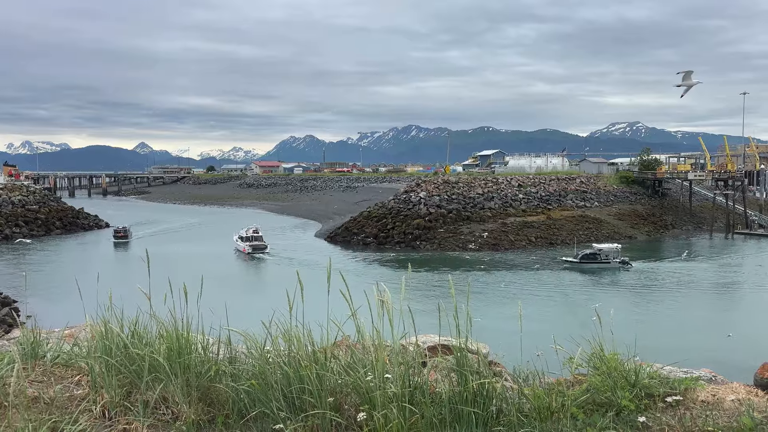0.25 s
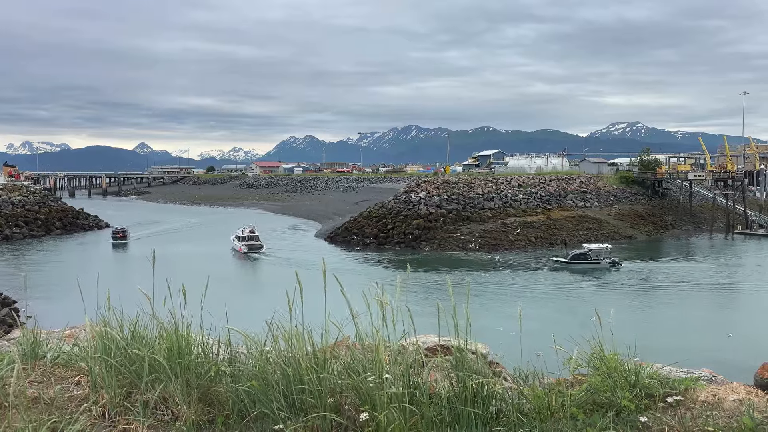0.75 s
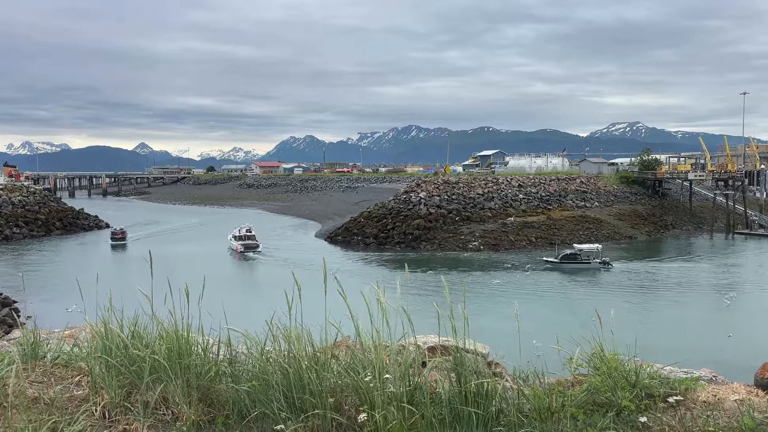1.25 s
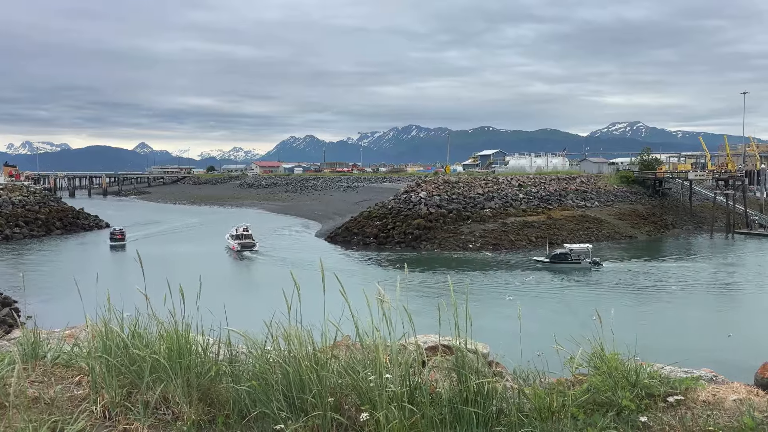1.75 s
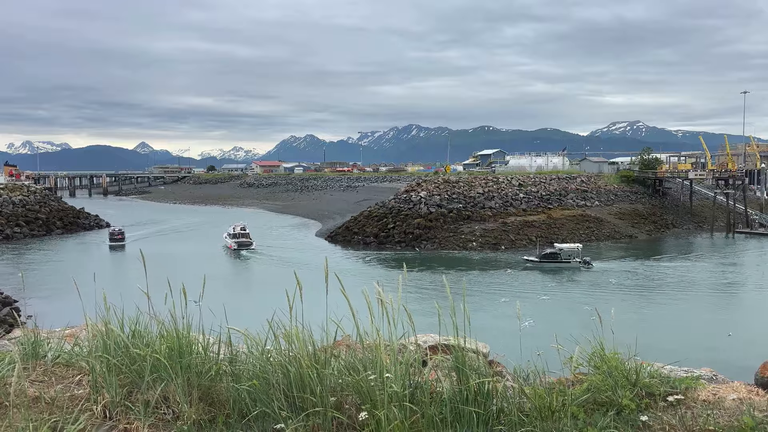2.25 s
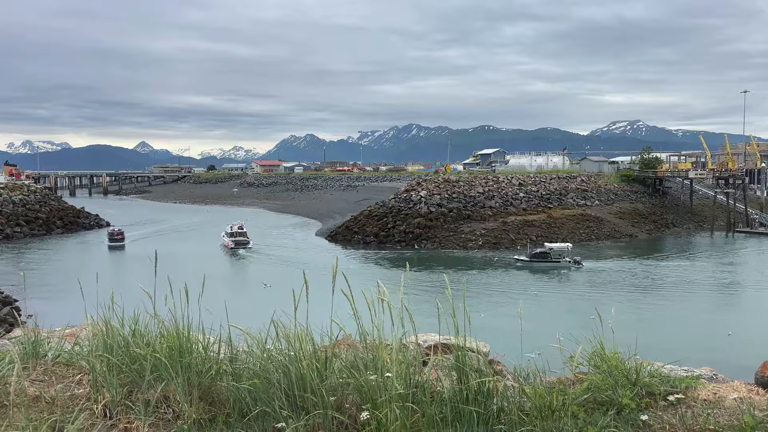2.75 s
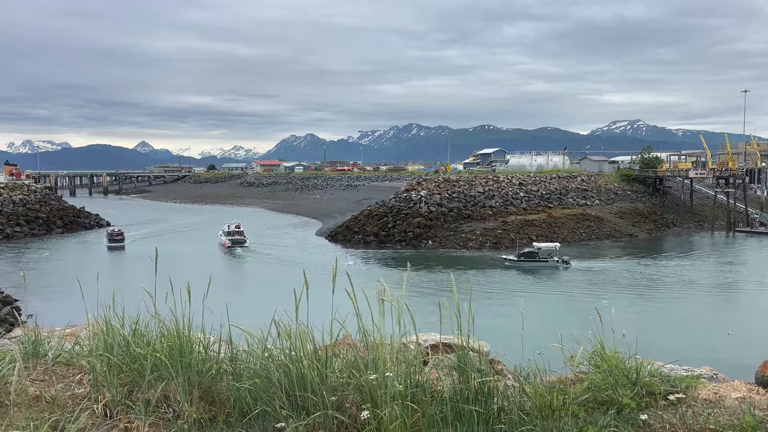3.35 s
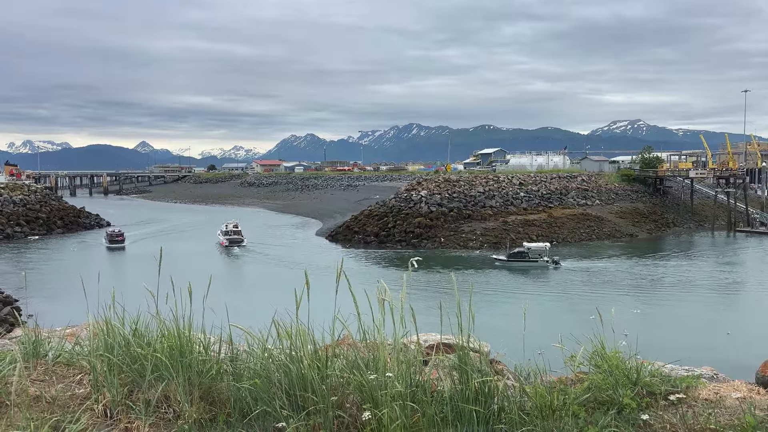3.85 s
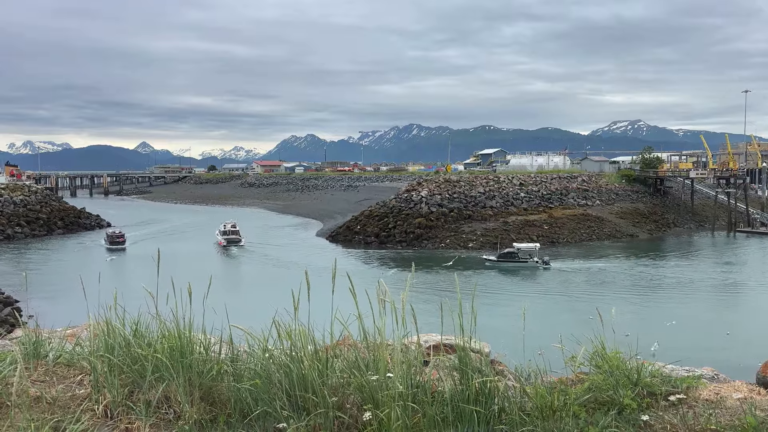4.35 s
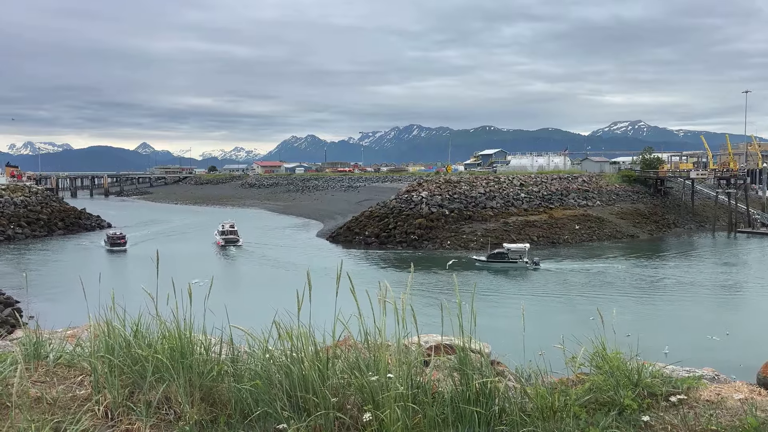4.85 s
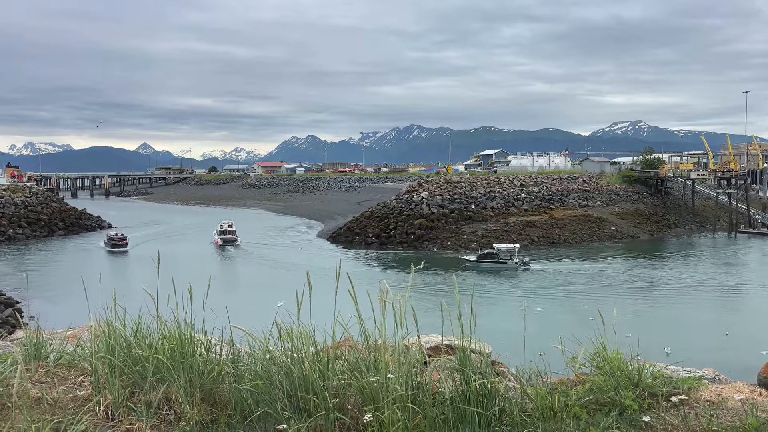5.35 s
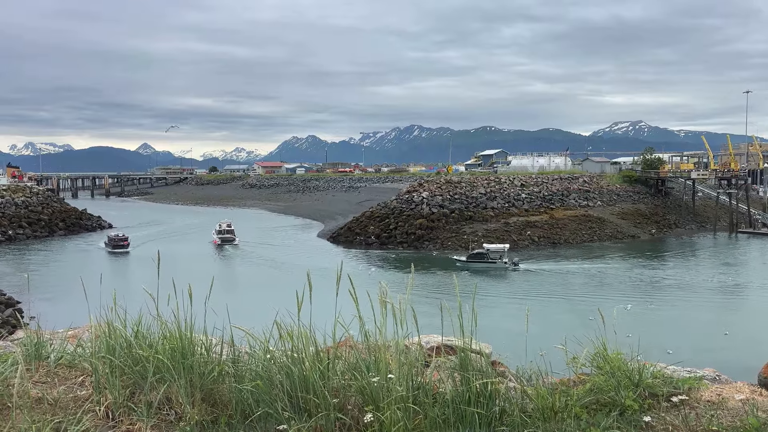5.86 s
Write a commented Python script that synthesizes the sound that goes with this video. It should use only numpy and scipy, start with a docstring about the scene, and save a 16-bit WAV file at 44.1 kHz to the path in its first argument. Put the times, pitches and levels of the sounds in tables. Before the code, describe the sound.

Outdoors at a harbour entrance, heard in stereo from a grassy bank. A low, steady rumble of small boat motors runs throughout, with water hissing softly along the stones. Gulls cry at once: overlapping mews, yelps and high whistles, partly on the right, with rasping screeches around 0.4-0.6 s and faint distant birds behind. From 1.1 to 2.1 s three wails climb and break upward. A dense cluster of mews, whistles and screeches fills 2.1-2.8 s. Short hoarse cackles follow from 2.9 to 3.8 s, with small dry knocks near 3 and 3.6 s, while wash and bright grassy rustle swell most strongly around 3.5 s. From 4.0 to 4.6 s a near gull chatters shrilly on the right. Weaker, spaced cackles continue from 4.9 to 6 s, with a mild swell of wash near 5.8 s. Breakwaters return a faint echo and thin tail.

```python
"""Gulls cry at once over a harbour entrance, in mews, yelps and whistles, with short cackles later on.
Boats rumble low, their wash hisses on the shore, and a bright rustle of tall grass, blurred with far
gull voices, swells several times. Each call is a sum of harmonics with an unsteady pitch; boats, wash and
rustle are banded noise, the boats with motor tones added. Small dry ticks are decaying bursts of noise,
and stone breakwaters return a distinct echo and a thin tail."""
import sys
import numpy as np
from scipy import signal
from scipy.io import wavfile
from scipy.ndimage import map_coordinates

SR = 44100
rng = np.random.default_rng(int(sys.argv[2]) if len(sys.argv) > 2 else 0)


def output_pcm(signal):
    """Save a mono or channel-first signal as 16-bit PCM at the path in sys.argv[1].

    Samples are clipped to [-1, 1] before scaling.
    """
    pcm = np.clip(np.atleast_2d(signal).T, -1, 1) * 32767
    wavfile.write(sys.argv[1], SR, np.round(pcm).astype(np.int16))


N = 269451
TIME = np.arange(N) / SR
CUTOFF_HZ = 15800  # no harmonic is sounded above this, and the final low-pass cuts here

# harmonics of a mew, from the fundamental up: relative level/dB
MEW_PARTIALS_DB = [-27, 0.5, -27, -25, -35, -40]
MEW_SAG = 0.038  # fall from start to end, as a share of the pitch


def from_db(db):
    """Decibels to amplitude gain: 20 dB is a factor of ten."""
    return 10 ** (np.asarray(db) / 20)


def rms_one(x):
    """Normalise mean power: scale to rms 1."""
    return x / np.sqrt(np.mean(x ** 2) + 1e-20)


def at_hz(points, hz):
    """Interpolate a spectrum linearly on a log-frequency axis."""
    freqs, values = np.transpose(points)
    return np.interp(np.log(hz), np.log(freqs), values)


def drift(rate, size=N):
    """Random modulation: `rate` normal values a second, joined by curves if short, by lines at full length."""
    at = np.arange(size) * rate / SR + 2
    values = rng.standard_normal(int(at[-1]) + 4)
    return map_coordinates(values, [at], order=2 if size < N else 1, mode="nearest")


def band(x, low_hz, high_hz):
    """Butterworth band-pass: a maximally flat pass band."""
    sos = signal.butter(2, [low_hz, min(high_hz, .45 * SR)], "band", fs=SR, output="sos")
    return signal.sosfilt(sos, x)


def add(out, s, sound, pan_db):
    """Intensity panning: mix a mono sound in at time s, the left `pan_db` above the right."""
    start = max(round(s * SR), 0)
    sound = sound[:N - start]
    sides = from_db(np.array([[.5], [-.5]]) * pan_db)
    out[:, start:start + len(sound)] += sound * sides / sides.mean()


def humps(rows):
    """Superpose Gaussian rises and dips in level, in dB."""
    return sum(db * np.exp(-((TIME - s) / width) ** 2) for s, width, db in rows)


def banded_noise(spectrum, flicker_db, flicker_rate):
    """Filtered noise: half-octave bands, each flickering on its own, partly correlated between ears; rms 1."""
    # likeness of the two ears: f/Hz, left-right correlation
    likeness = [(40, 0.97), (170, 0.95), (260, 0.78), (400, -0.22), (700, -0.03), (1500, 0.17),
                (9000, -0.027)]
    edges = 20 * 2 ** np.arange(0, 10.1, .5)
    white = rng.standard_normal((2, 2, N))
    out = 0
    for k, (low, high) in enumerate(zip(edges, edges[1:])):
        hz = np.sqrt(low * high)
        if spectrum[0][0] / np.sqrt(2) < hz < spectrum[-1][0] * np.sqrt(2):
            mid, side = band(white[k % 2], low, high)
            alike = np.clip(at_hz(likeness, hz), -1, 1)
            gain = from_db(at_hz(spectrum, hz) + flicker_db * drift(flicker_rate))
            stereo = np.sqrt(1 + alike) * mid + np.sqrt(1 - alike) * side * [[1], [-1]]
            out = out + gain * stereo
    return rms_one(out)


def glide(length, hz, change, arch=0):
    """Frequency modulation of a note: a slide through `hz`, both ends lowered by the arch."""
    along = np.linspace(-.5, .5, int(length * SR))
    return hz * (1 + change * along - arch * (2 * along) ** 2)


def voice(pitch, partials_db, waver, rasp, flutter_db):
    """Harmonic synthesis of a syrinx: the pitch wavers slowly and jitters fast, and the strength flutters."""
    size = len(pitch)
    pitch = pitch * (1 + waver * drift(92.5, size) + rasp * drift(884, size))
    phase = 2 * np.pi * np.cumsum(pitch) / SR
    tone = sum(from_db(db) * np.sin(k * phase + rng.uniform(0, 2 * np.pi))
               for k, db in enumerate(partials_db, 1) if k * pitch.mean() < CUTOFF_HZ)
    return tone * from_db(flutter_db * drift(122.6, size))


def swell(size, loudest, fullness):
    """Amplitude envelope of one effort: an arch with its top at the share `loudest`; rms 1."""
    top = np.clip(loudest, .1, .9)
    angle = np.interp(np.linspace(0, 1, size), [0, top, 1], [0, np.pi / 2, np.pi])
    return rms_one(np.abs(np.sin(angle)) ** fullness)  # a smaller exponent makes a fuller arch


def cry(pitch, partials_db, db, loudest):
    """A voiced call: quasi-periodic harmonics under a single arch of effort."""
    tone = voice(pitch, partials_db, waver=0.0042, rasp=0.0073, flutter_db=2.5)
    return from_db(db + 3.5) * tone * swell(len(pitch), loudest, fullness=0.29)


def boats(ear_lag_s=0.00079):
    """Periodic firing gives tones at multiples of a wandering rate in a broad rumble; the left ear lags."""
    # exhaust and low wind: f/Hz, relative density/dB per Hz
    rumble = [(20, -37), (30, -31), (40, -0.5), (55, 1), (90, -3), (130, -4.5), (200, -9), (280, -13),
              (400, -21.5), (800, -32.5), (2000, -82)]
    # motor tones: multiple of the firing rate, mean level/dB
    motor_orders = [(3, -42.5), (4, -51), (5.1, -46)]
    firing_hz = 39.87  # mean
    sound = from_db(-28.5) * banded_noise(rumble, flicker_db=1.0, flicker_rate=9)
    for multiple, db in motor_orders:
        order_hz = multiple * firing_hz * (1 + 0.00843 * drift(4))
        phase = 2 * np.pi * np.cumsum(order_hz) / SR
        sound = sound + from_db(db + 2 * drift(2.17)) * np.sin(phase)
    return np.array([np.interp(TIME - ear_lag_s, TIME, sound[0]), sound[1]])


def shore(hump_hz=1950, hump_db=4, hollow_hz=2550, hollow_db=-4.0):
    """Turbulent wash is broadband noise, swelling as wakes reach the stones, with a spectral hump and hollow."""
    # water along the shore: f/Hz, relative density/dB per Hz
    wash_spectrum = [(150, -10), (450, 2), (900, 3), (1750, -0.5), (2150, -7.5), (2600, -7.5),
                     (3600, -13.5), (5000, -26), (7000, -37), (10000, -37.5)]
    # swells and lulls: t/s, half width to 1/e /s, change/dB
    wash_swells = [(.1, 0.31, -3.5), (3.6, 0.38, 4.5), (5.8, 0.27, 2.5)]
    wash_db = -38  # before swells and lulls
    wash = banded_noise(wash_spectrum, flicker_db=2.0, flicker_rate=22)
    for hz, db in ((hump_hz, hump_db), (hollow_hz, hollow_db)):
        resonance = signal.lfilter(*signal.iirpeak(hz, 5, fs=SR), wash)
        wash = wash + (from_db(db) - 1) * resonance
    return from_db(wash_db + humps(wash_swells)) * rms_one(wash) * from_db([[-.55], [.55]])


def grass():
    """Amplitude-modulated noise: a bright grainy hiss that swells several times, some of it blurred gull voices."""
    # bright rustling hiss: f/Hz, relative density/dB per Hz
    rustle = [(1500, -20), (3500, 1), (5400, 11), (7000, -15), (8500, -10), (12000, -13), (16000, -30)]
    # rises of the bright rustling hiss: t/s, half width to 1/e /s, rise/dB
    rises = [(1.65, .1, 3.5), (2.33, 0.34, 7), (3.53, 0.41, 12.5), (5.8, 0.32, 3)]
    level_db = -59.5 + humps(rises)
    grain = from_db(level_db + 2.4 * drift(260))  # quick uneven bursts
    return grain * banded_noise(rustle, flicker_db=3.5, flicker_rate=23) * from_db([[-1.0], [1.0]])


def yelps():
    """Timbre follows harmonic balance: lower cries, with more or less brass above the second harmonic."""
    # t/s, length/s, f/Hz, glide as a share of f, relative level/dB, overtone change/dB, left-right/dB
    yelp_notes = [(.01, 0.062, 1124, 0, -54, 0.5, -15), (0.792, 0.092, 1150, .05, -38.5, -25, 3.5),
                  (1.077, 0.022, 1170, 0.034, -47.5, -12, 2), (1.552, 0.096, 1170, -0.0097, -46.5, 1, 2),
                  (1.751, 0.022, 1176, -0.025, -49.5, -3, 0), (2.369, 0.035, 1158, -0.031, -40, -13, 4),
                  (2.653, 0.043, 1290, -0.053, -47.5, -12, 4), (4.04, 0.105, 1240, -0.043, -57, 9.5, 1),
                  (4.554, 0.019, 1267, 0.044, -39, 1.5, -20), (4.674, 0.096, 1190, 0.03, -49.5, 0.5, -17)]
    # harmonics from the fundamental up: relative level/dB
    yelp_partials_db = [-19, 1.5, -10, -11.5, -20.5, -27.5, -30, -32, -32, -36]
    out = np.zeros((2, N))
    overtone = np.arange(len(yelp_partials_db)) >= 2
    for s, length, hz, change, db, brass_db, pan_db in yelp_notes:
        pitch = glide(length, hz, change, arch=-.014)
        partials_db = yelp_partials_db + brass_db * overtone
        add(out, s, cry(pitch, partials_db, db, loudest=.52), pan_db)
    return out


def breakwaters(x, t60=0.77, build_up_s=0.0033):
    """Diffuse reverberation: rough stone scatters a call into an exponential tail, different at each ear."""
    t = TIME[:SR]
    decay = from_db(-60 * t / t60)
    tail = band(rng.standard_normal((2, SR)), 630, 5200) * decay * (1 - np.exp(-t / build_up_s))
    tail /= np.sqrt(np.sum(tail ** 2) / 2)
    return signal.fftconvolve(x[None], tail, axes=1)[:, :N]


def mews():
    """A dominant second harmonic carries these cries, whose pitch sags through each note."""
    # t/s, length/s, f/Hz, relative level/dB, left-right/dB
    mew_notes = [(0.074, 0.062, 1637, -50, -20), (0.324, .093, 1640, -53, -15),
                 (0.35, 0.051, 1800, -49.5, -17), (0.552, 0.26, 887, -49.5, -1),
                 (0.579, 0.076, 1683, -52.5, -17), (0.745, 0.093, 869, -42, 2),
                 (0.827, 0.095, 1690, -50, -15), (1.1, .11, 1734, -45.5, 4), (1.21, 0.18, 1687, -54, 6),
                 (1.436, 0.057, 1695, -52, -15), (1.641, 0.051, 1740, -46.5, 3),
                 (1.701, 0.065, 1727, -51.5, -13), (1.98, 0.1, 1760, -57, 3), (2.172, 0.02, 1687, -39.5, 4),
                 (2.24, 0.084, 1716, -46, 3), (2.401, 0.024, 1687, -43.5, 4), (2.468, 0.119, 1680, -45, 6),
                 (2.598, 0.038, 1697, -40.5, 2), (2.828, 0.035, 1700, -41.5, 3),
                 (5.247, 0.077, 1647, -48, -23)]
    out = np.zeros((2, N))
    for s, length, hz, db, pan_db in mew_notes:
        pitch = glide(length, hz, -MEW_SAG, arch=.002)
        add(out, s, cry(pitch, MEW_PARTIALS_DB, db, loudest=0.45), pan_db)
    return out


def whistles():
    """Nearly sinusoidal high notes; the more the pitch is arched upward, the more it quavers."""
    # t/s, length/s, f/Hz, glide and arch as shares of f, relative level/dB, left-right/dB
    whistle_notes = [(.195, 0.098, 4710, 0.07, 0.053, -54, -22), (.275, 0.075, 4300, -0.036, 0, -51.5, -20),
                     (1.4, .03, 3810, -0.072, -0.0043, -56.5, -8),
                     (1.629, .18, 3910, -.04, -0.0094, -56, 1),
                     (1.895, 0.23, 4140, -0.014, -0.0022, -58, 5),
                     (2.095, .23, 2870, 0.019, -0.0058, -46.5, 3),
                     (2.206, 0.14, 4800, -0.073, .015, -51.5, -7), (2.25, 0.16, 5860, .04, 0.0049, -62, 3),
                     (2.316, 0.133, 4100, -.012, 0.0057, -46.5, 3),
                     (2.495, .18, 7370, -.075, -0.036, -61.5, -4),
                     (3.995, .016, 8300, .3, -0.0092, -62, -6), (4.46, .026, 8700, .22, -.02, -59.5, -15),
                     (4.603, .03, 8100, -.08, 0, -61, -15)]
    # harmonics from the fundamental up: relative level/dB
    whistle_partials_db = [0.5, -29]
    quaver, quaver_per_s = .2, 62  # share of the arch, new random values a second
    out = np.zeros((2, N))
    for s, length, hz, change, arch, db, pan_db in whistle_notes:
        pitch = glide(length, hz, change, arch)
        pitch = pitch * (1 + quaver * max(arch, 0) * drift(quaver_per_s, len(pitch)))
        add(out, s, cry(pitch, whistle_partials_db, db, loudest=0.3), pan_db)
    return out


def colony(count=10):
    """Distance weakens sound: birds farther off mew faintly at random pitches in the opening chorus."""
    low_hz, high_hz, length_s = 1110, 1790, 0.074
    chorus_end_s = 2.6  # the last moment a far cry may start
    out = np.zeros((2, N))
    for when, high, side in rng.random((count, 3)):
        pitch = glide(length_s, low_hz + high * (high_hz - low_hz), -MEW_SAG)
        far_cry = cry(pitch, MEW_PARTIALS_DB, -59.5, loudest=0.82)
        add(out, when * chorus_end_s, far_cry, pan_db=-8 * side)
    return out


def screeches():
    """Chaotic vibration of the syrinx: pitch jitter smears the harmonics into rasping, throbbing bands."""
    # t/s, length/s, f/Hz, level/dB before the arch, left-right/dB
    screech_notes = [(0.394, 0.14, 1204, -51, -18), (0.496, 0.15, 1154, -52.5, -24),
                     (2.367, 0.15, 1171, -48.5, -1), (2.492, 0.22, 1110, -54, -1)]
    # throat resonances: f/Hz, relative level/dB
    screech_throat = [(1200, -24), (2400, 3.5), (3600, 4.5), (4700, 5.5), (5900, -8), (7200, -10),
                      (9500, -34)]
    pulse_hz, pulse_depth = 18, 0.33
    out = np.zeros((2, N))
    for s, length, hz, db, pan_db in screech_notes:
        size = int(length * SR)
        partials_db = at_hz(screech_throat, hz * np.arange(1, 9))
        tone = voice(np.full(size, hz), partials_db, waver=.01, rasp=.025, flutter_db=3)
        tone = tone * (1 - pulse_depth * np.cos(2 * np.pi * pulse_hz * TIME[:size]))
        add(out, s, from_db(db) * rms_one(tone) * swell(size, loudest=0.32, fullness=0.44), pan_db)
    return out


def wails(count=7):
    """A rising source moves its harmonics through fixed throat resonances, then breaks upward and sinks."""
    # t/s, starting f/Hz, relative level of the climb/dB, relative level of the broken note/dB
    wail_notes = [(1.115, 835, -45.5, -45), (1.455, 750, -43, -41.5), (1.832, 730, -43, -37)]
    # throat resonances: f/Hz, relative level/dB
    wail_throat = [(750, -35), (1450, -2.5), (1720, 0), (2000, -19), (2300, 3), (2500, -15), (3300, -36),
                   (6000, -40)]
    climb_s, top_hz, pan_db = .122, 886, 4.5
    break_s, break_from_hz, break_to_hz, settle_s = 0.087, 1440, 1245, .033
    out = np.zeros((2, N))
    along = np.linspace(0, 1, int(climb_s * SR))
    settling = np.exp(-TIME[:int(break_s * SR)] / settle_s)
    broken = break_to_hz + (break_from_hz - break_to_hz) * settling
    for s, hz, climb_db, broken_db in wail_notes:
        pitch = hz + (top_hz - hz) * along ** 1.7  # climbs ever faster
        partials_db = [at_hz(wail_throat, (k + 1) * pitch) for k in range(count)]
        add(out, s, cry(pitch, partials_db, climb_db, loudest=0.54), pan_db)
        add(out, s + climb_s, cry(broken, [-1, -21, -28, -43], broken_db, loudest=0.09), pan_db)
    return out


def slap(x, delay_s=.05):
    """Specular reflection: the nearest breakwater returns one distinct, delayed echo."""
    return from_db(-15) * np.array([np.interp(TIME - delay_s, TIME, ear, left=0) for ear in x])


def ticks(decay_s=0.0021):
    """Damped resonance: small dry knocks, each a noise burst that dies within milliseconds in one broad band."""
    # t/s, peak level/dB, f/Hz
    tick_events = [(1.183, -46, 6200), (2.187, -42, 6470), (2.947, -23.5, 1520), (3.018, -24, 1580),
                   (3.02, -29.5, 3300), (3.450, -38, 6460), (3.622, -27, 1490), (3.78, -42, 8200)]
    out = np.zeros((2, N))
    t = TIME[:SR // 50]
    for s, db, hz in tick_events:
        burst = rng.standard_normal(len(t)) * np.exp(-t / decay_s)
        tick = band(band(burst, hz / 1.3, hz * 1.3), hz / 1.4, hz * 1.4)
        add(out, s, from_db(db) * tick / np.abs(tick).max(), pan_db=-3)
    return out


def cackles():
    """Source and filter: one gull's short note drops through throat resonances; the shorter, the hoarser."""
    # t/s, length/s, f/Hz, drop as a share of f, relative level/dB
    cackle_notes = [(2.855, 0.019, 960, 0.083, -36), (3.087, 0.038, 995, .1, -35),
                    (3.374, .044, 1030, 0.083, -34), (3.625, 0.016, 837, .02, -39),
                    (3.714, .056, 1018, 0.066, -36.5), (4.864, 0.02, 905, .06, -43),
                    (5.128, 0.048, 936, 0.14, -45), (5.39, .044, 936, 0.18, -49),
                    (5.659, 0.052, 920, 0.18, -44), (6.011, 0.041, 907, 0.18, -43.5)]
    # throat resonances: f/Hz, relative level/dB
    cackle_throat = [(1000, -5.5), (2000, -7.5), (2750, 1), (3500, -7.5), (4100, 0), (5000, -19),
                     (8000, -34)]
    out = np.zeros((2, N))
    for s, length, hz, drop, db in cackle_notes:
        pitch = glide(length, hz, -drop)
        partials_db = [at_hz(cackle_throat, k * pitch) for k in range(1, 9)]
        rasp = .08 * np.exp(-length / 0.023)
        tone = voice(pitch, partials_db, waver=0.0042, rasp=rasp, flutter_db=1.5)
        effort = swell(len(pitch), loudest=.48, fullness=0.37)
        add(out, s, from_db(db - 4.5) * rms_one(tone) * effort, pan_db=1.0)
    return out


def chatter():
    """Subharmonic modulation: a near bird's shrill notes on the right throb every few cycles and buzz."""
    # t/s, length/s, f/Hz, relative level/dB, overtone change/dB, buzz depth (0-1)
    chatter_notes = [(4.011, 0.018, 3260, -44, 8.5, 0), (4.144, 0.12, 4364, -45.5, 3.5, .25),
                     (4.242, 0.073, 3590, -41, -3.5, 0.2), (4.317, 0.029, 4210, -43.5, -3.5, .3),
                     (4.355, 0.042, 3500, -40, -5, .05), (4.407, .033, 3485, -40, 0, 0),
                     (4.498, 0.042, 3450, -37, -2, .1), (4.573, 0.015, 3390, -39.5, -3, 0.4)]
    # harmonics from the fundamental up: relative level/dB
    chatter_partials_db = [0, -15, -28.5, -34]
    sag, buzz_cycles = 0.018, 5  # share of the pitch, cycles of the voice in one throb
    out = np.zeros((2, N))
    overtone = np.arange(len(chatter_partials_db)) >= 1
    for s, length, hz, db, shrill_db, buzz in chatter_notes:
        pitch = glide(length, hz, -sag)
        throb = 1 + buzz * np.sin(2 * np.pi * np.cumsum(pitch) / (buzz_cycles * SR))
        partials_db = chatter_partials_db + shrill_db * overtone
        add(out, s, throb * cry(pitch, partials_db, db, loudest=0.7), pan_db=-12.5)
    return out


def scene():
    """Superposition of gulls, boats, water and rustle; stone doubles the wails and cackles over the channel."""
    channel = wails() + cackles()
    gulls = channel + mews() + yelps() + whistles() + chatter() + screeches() + colony()
    echo = slap(channel) + from_db(-15) * breakwaters(gulls[0])
    return gulls + echo + boats() + shore() + grass() + ticks()


def record(dry, hiss_db=-60.5):
    """Band-limiting: the microphone adds a faint steady hiss and drops the deepest bass; the top is cut."""
    dry = dry + from_db(hiss_db) * rng.standard_normal(dry.shape)
    dry = signal.sosfilt(signal.butter(4, 29, "high", fs=SR, output="sos"), dry)
    return signal.sosfilt(signal.ellip(10, .1, 90, CUTOFF_HZ, fs=SR, output="sos"), dry)


dry = scene()
out = record(dry)
output_pcm(out)
```